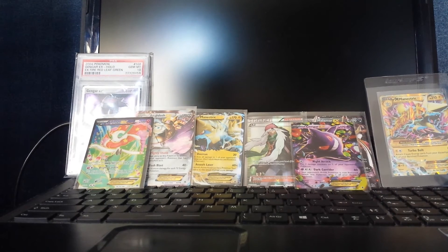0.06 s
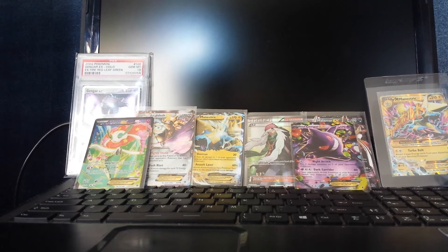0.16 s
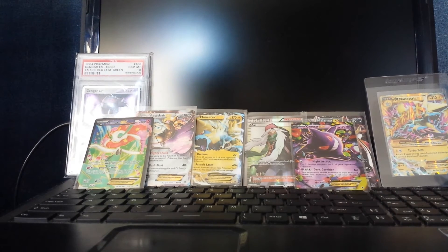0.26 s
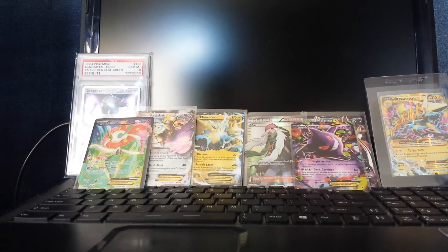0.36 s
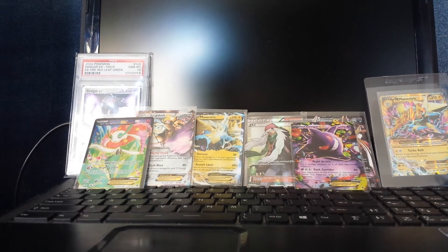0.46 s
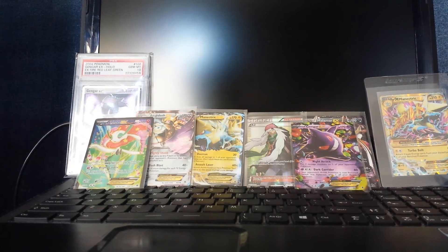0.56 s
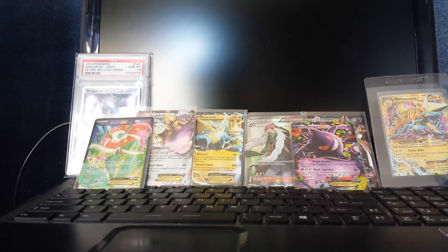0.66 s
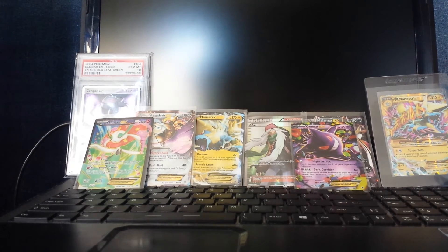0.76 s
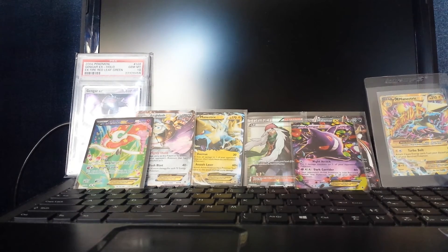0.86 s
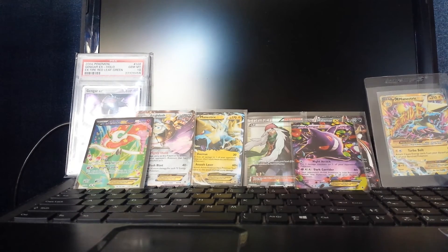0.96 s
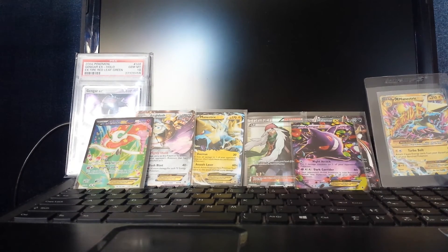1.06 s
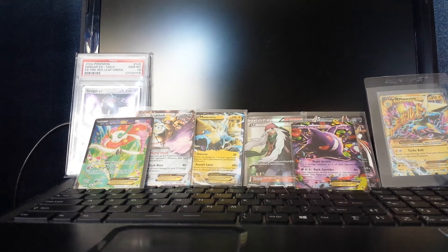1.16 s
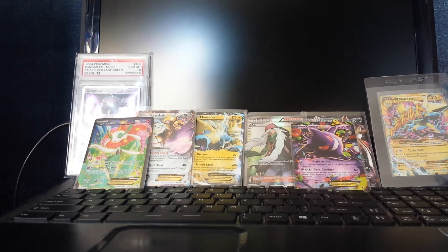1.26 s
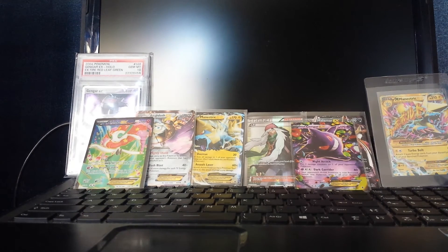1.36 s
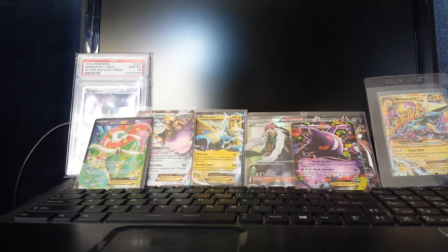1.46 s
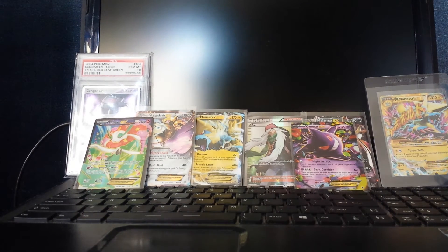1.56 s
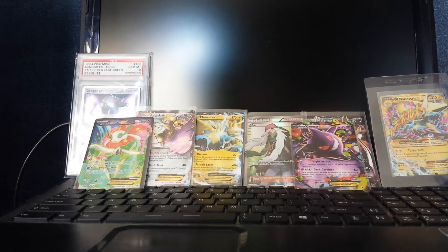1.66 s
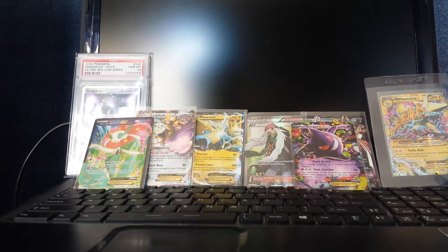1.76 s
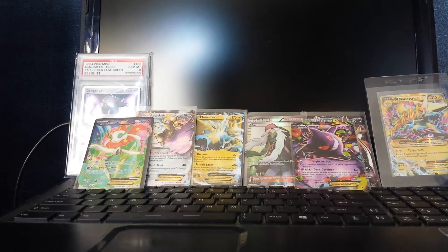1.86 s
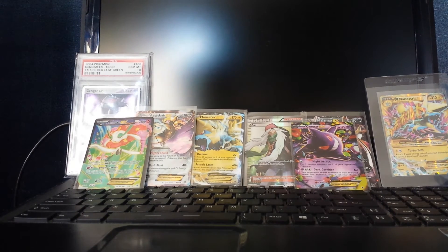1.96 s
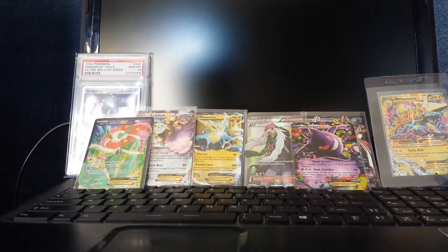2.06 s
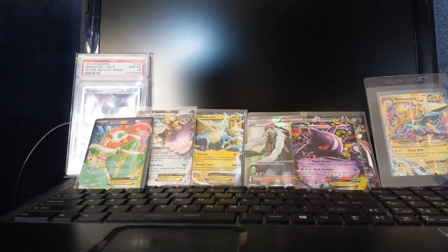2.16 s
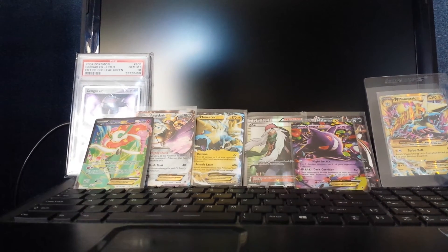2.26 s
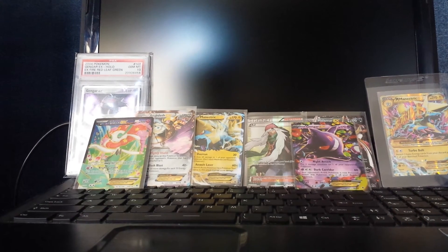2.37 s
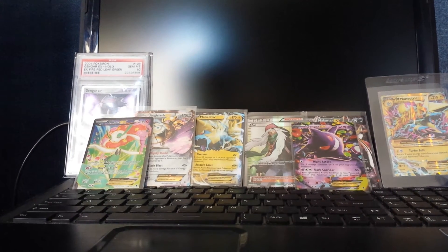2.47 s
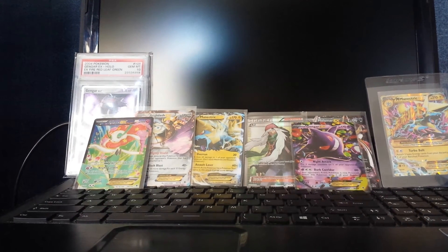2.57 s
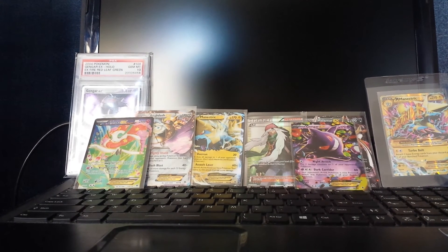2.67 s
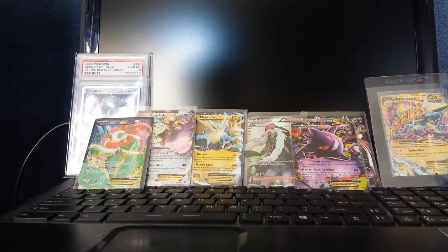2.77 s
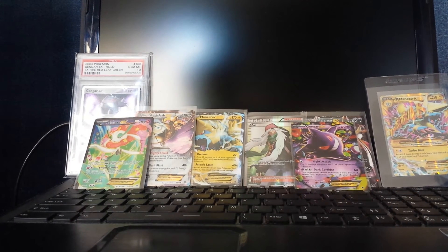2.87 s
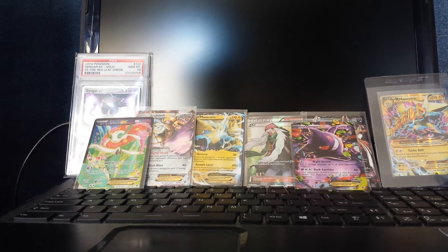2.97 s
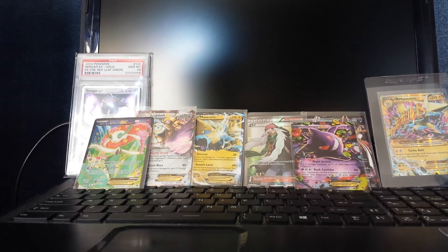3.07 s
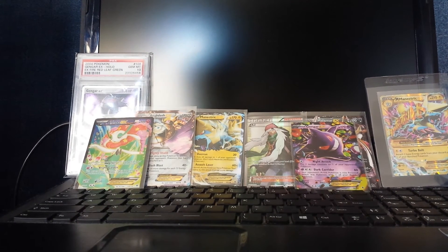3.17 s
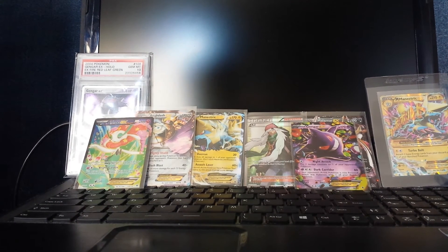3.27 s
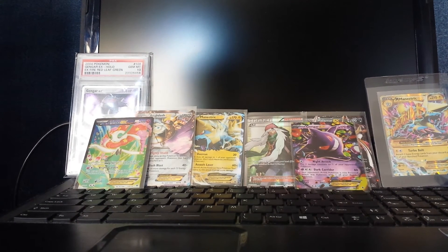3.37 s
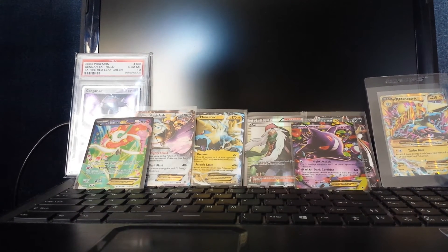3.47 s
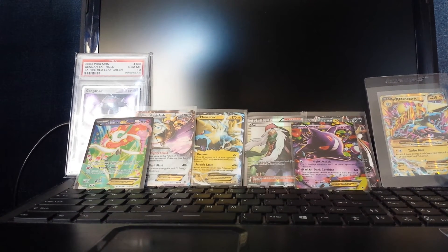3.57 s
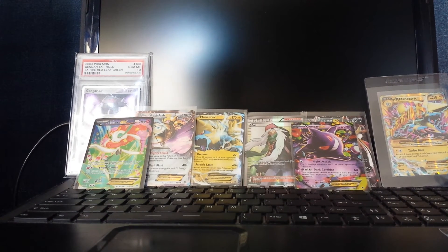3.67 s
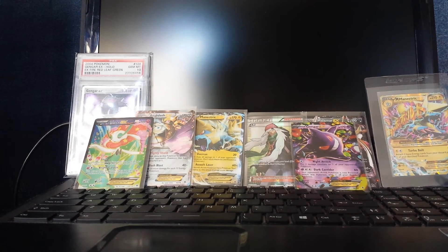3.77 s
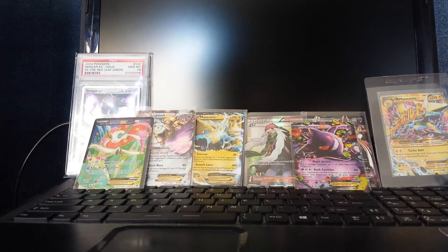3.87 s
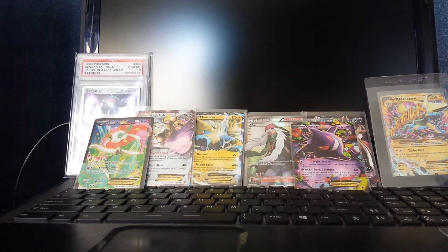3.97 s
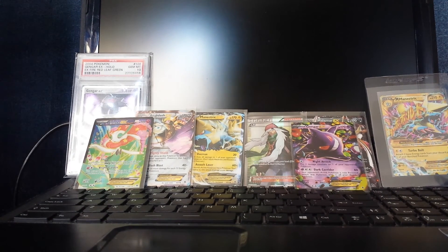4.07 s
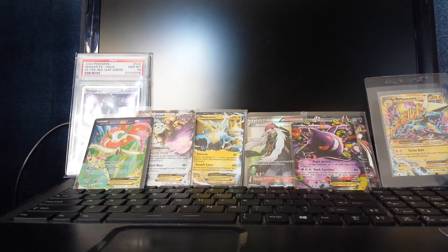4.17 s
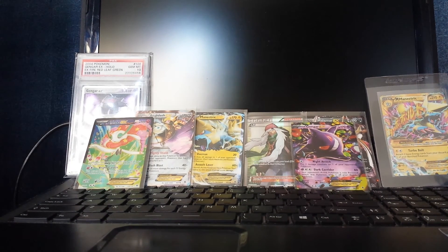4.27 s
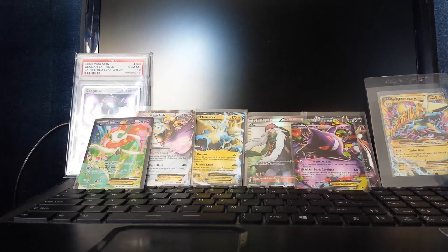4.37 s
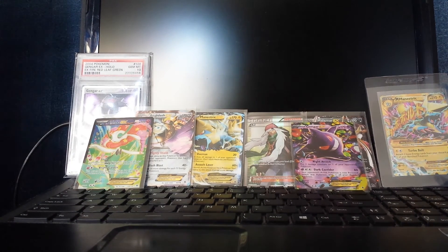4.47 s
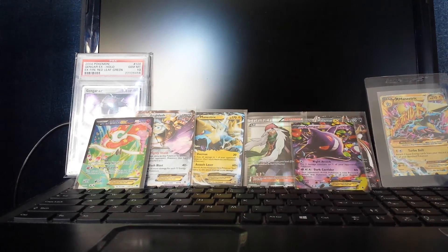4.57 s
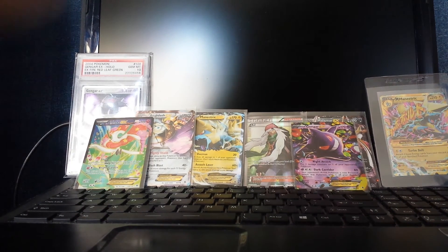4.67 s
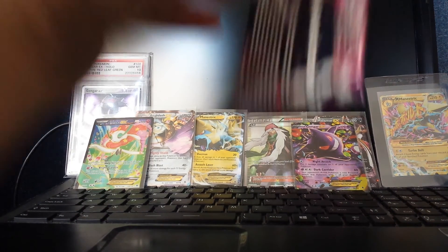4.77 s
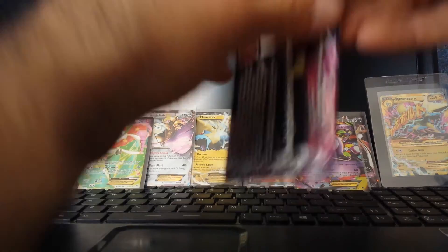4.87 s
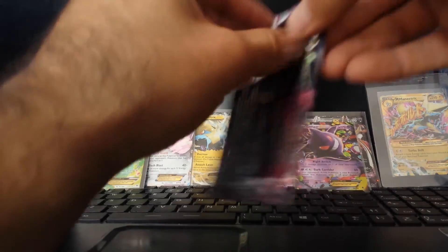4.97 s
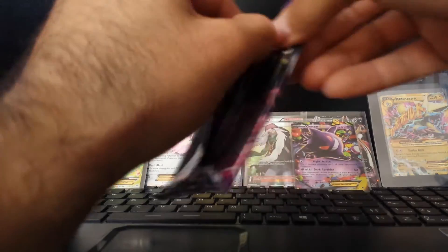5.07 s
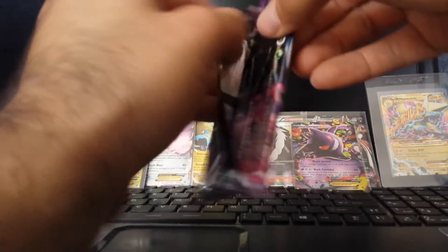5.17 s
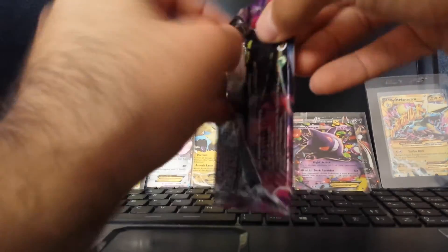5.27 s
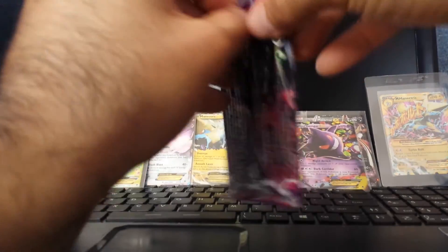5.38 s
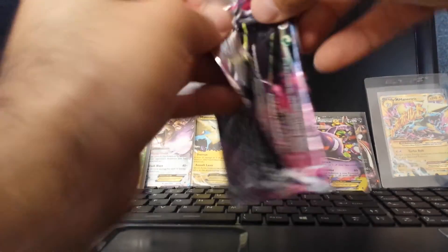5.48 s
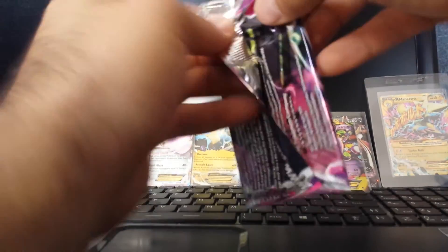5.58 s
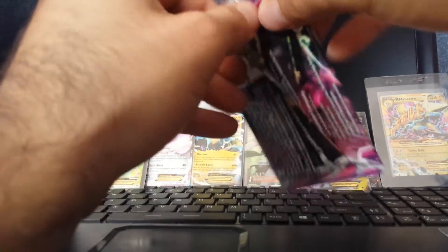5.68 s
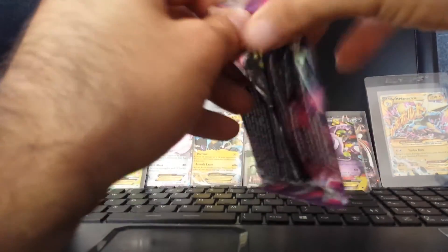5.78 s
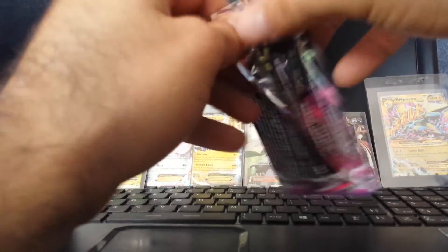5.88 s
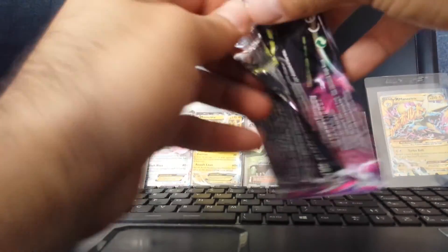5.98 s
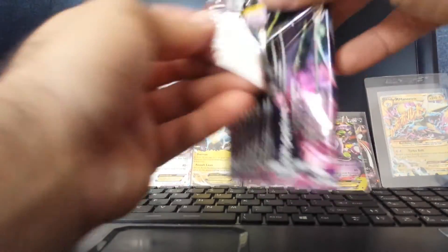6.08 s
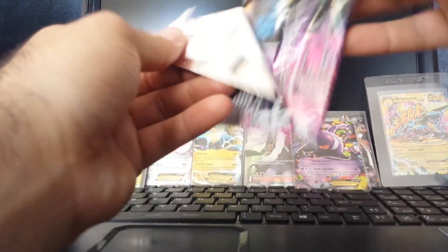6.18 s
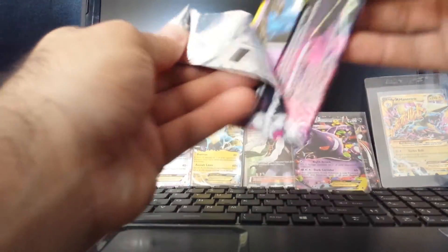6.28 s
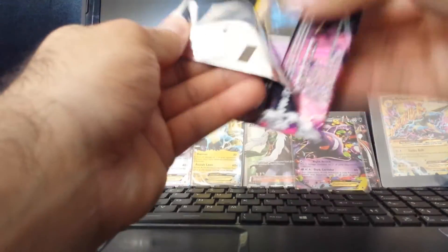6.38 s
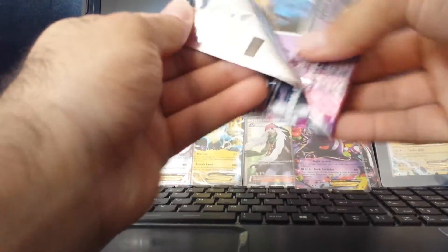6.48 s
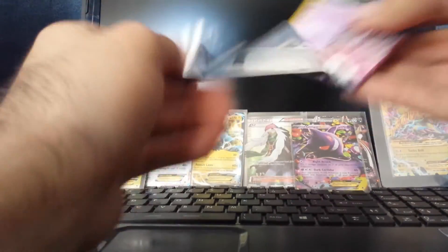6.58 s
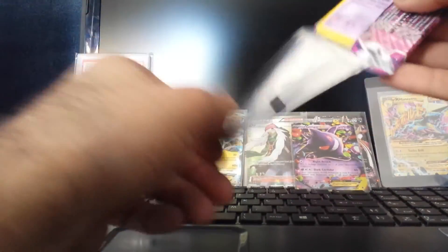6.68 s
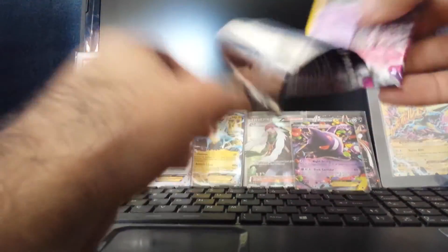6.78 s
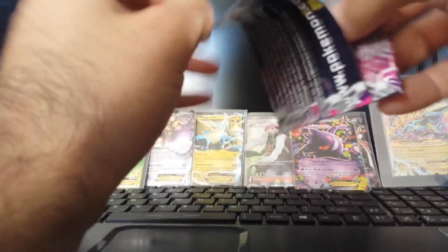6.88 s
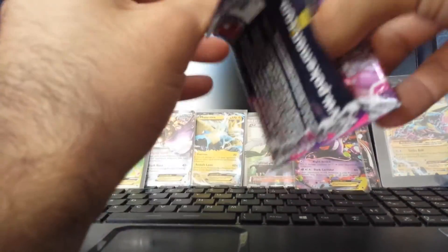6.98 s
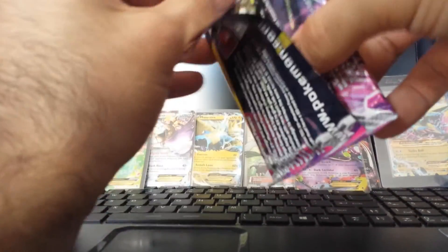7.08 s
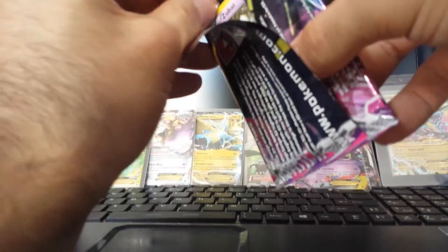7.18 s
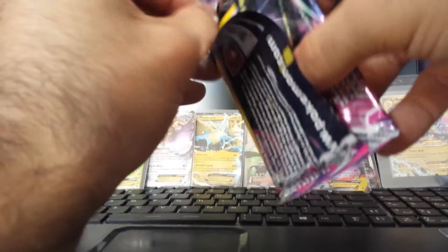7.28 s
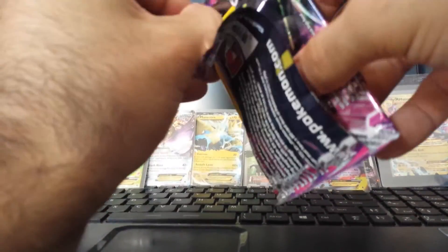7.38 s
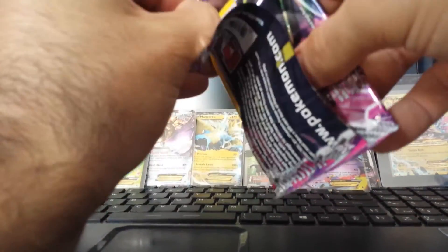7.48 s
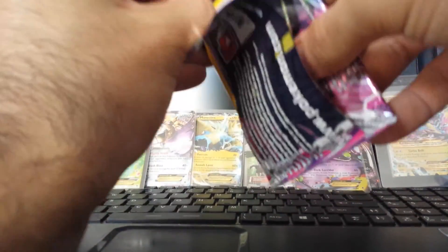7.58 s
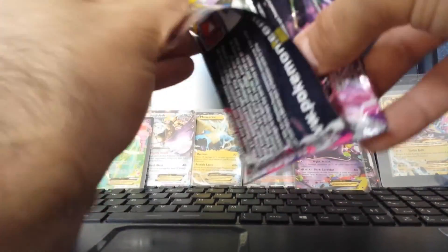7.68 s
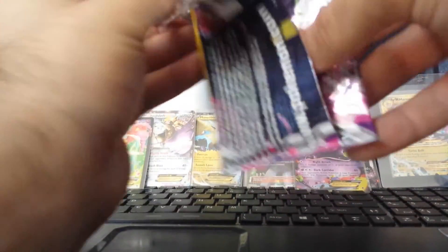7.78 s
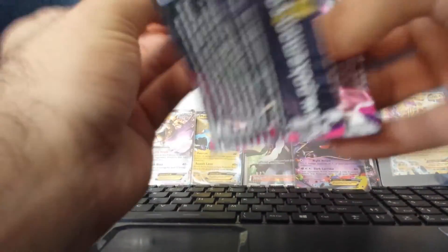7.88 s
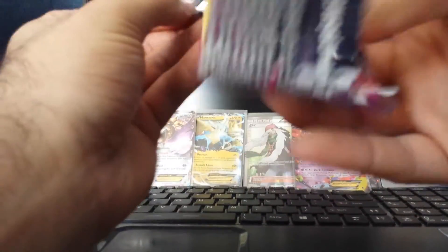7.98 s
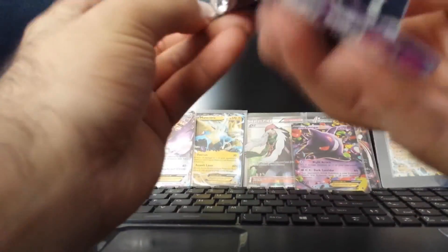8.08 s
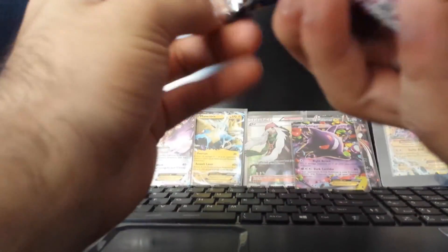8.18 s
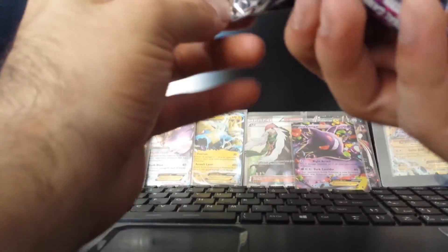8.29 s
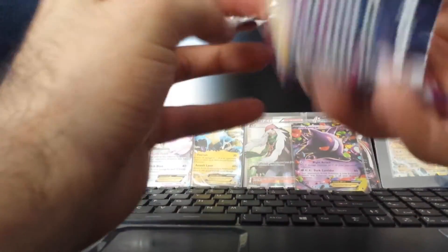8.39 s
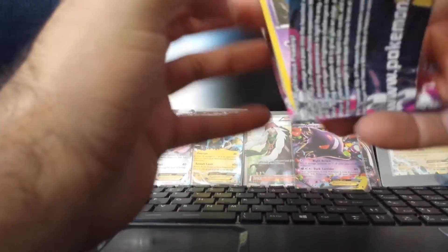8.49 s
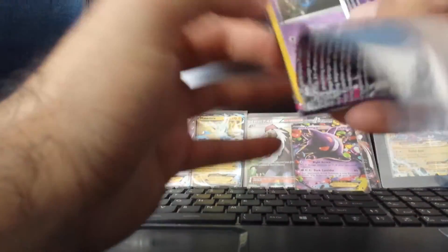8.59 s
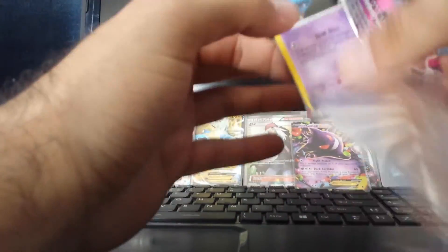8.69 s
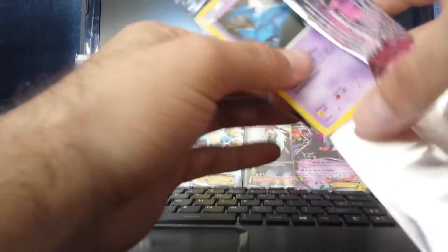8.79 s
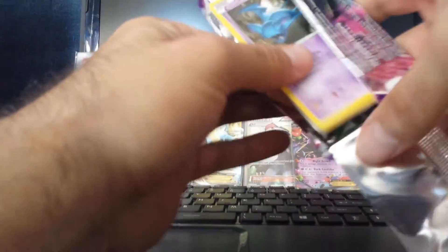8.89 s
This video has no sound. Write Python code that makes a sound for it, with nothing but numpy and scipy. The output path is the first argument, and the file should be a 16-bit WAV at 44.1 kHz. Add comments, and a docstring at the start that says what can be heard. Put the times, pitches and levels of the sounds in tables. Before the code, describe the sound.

After quiet clacks and swishes, stiff foil snaps and crinkles near the microphone, its seam tearing in two quick pulls.

```python
"""Creases of a foil trading-card pack snap one by one over a fine crinkle, close to a camera.
Each snap is a pair of buckling impulses, led by a tick, that excites facet, sheet and cards; dense grains crinkle.
Knocks and slides, filtered contact noise, come first and further off; the seam rips in two quick
pulls of close slips, then peels slowly and faintly. A small room answers; two microphone ports hiss faintly."""
import sys
import numpy as np
from scipy import signal
from scipy.fft import rfft, irfft, next_fast_len
from scipy.io import wavfile
from scipy.ndimage import uniform_filter1d, map_coordinates

SR = 44100
rng = np.random.default_rng(int(sys.argv[2]) if len(sys.argv) > 2 else 0)


def materialize(psi):
    """Save the field psi as 16-bit PCM at rate SR to the path in sys.argv[1].

    A 1-D psi becomes a single channel; in a 2-D psi each row is a channel.
    """
    bounded = np.clip(np.atleast_2d(psi).T, -1, 1)
    quanta = np.round(bounded * 32767).astype(np.int16)
    wavfile.write(sys.argv[1], SR, quanta)


N = 394254
TIME = np.arange(N) / SR


def amp(db):
    """Logarithmic level: decibels to amplitude gain."""
    return 10 ** (np.asarray(db) / 20)


def unit(x):
    """Normalization: scale to rms 1."""
    return x / np.sqrt(np.mean(x ** 2) + 1e-20)


def along(points, hz):
    """Logarithmic frequency: interpolate (Hz, value) points on a log axis."""
    f, v = np.transpose(points)
    return np.interp(np.log(hz + 1), np.log(f + 1), v)


def ports(balance_db):
    """Level difference: left and right gains of mean power 1, the left higher by the balance."""
    return unit(amp([[balance_db / 2], [-balance_db / 2]]))


def add(track, s, sound):
    """Superposition: mix a sound into a track at a time in seconds."""
    start = max(round(s * SR), 0)
    part = track[:, start:start + sound.shape[-1]]
    part += sound[..., :part.shape[-1]]


def coloured(x, spectrum, size=2048):
    """Minimum phase: a causal filter with the given spectrum, by folding its cepstrum."""
    gain = amp(along(spectrum, np.fft.rfftfreq(size, 1 / SR)))
    cepstrum = irfft(np.log(np.maximum(gain, 1e-6)))
    cepstrum[1:size // 2] *= 2
    cepstrum[size // 2 + 1:] = 0
    response = irfft(np.exp(rfft(cepstrum)))
    return signal.fftconvolve(x, response[None], axes=1)[:, :x.shape[1]]


def band(x, lo_hz, hi_hz, order=2):
    """Band limitation: a causal Butterworth band-pass."""
    edges_hz = [lo_hz, min(hi_hz, SR / 2 - 100)]
    return signal.lfilter(*signal.butter(order, edges_hz, 'band', fs=SR), x)


def wobble(rate):
    """Slow fluctuation: a smooth random curve, rate knots a second."""
    knots = rng.standard_normal(int(N * rate / SR) + 4)
    return map_coordinates(knots, [np.arange(N) * rate / SR])


def pair(apart):
    """Partial coherence: stereo noise whose two sides differ by a share."""
    mid, side = rng.standard_normal((2, N))
    return np.array([mid + apart * side, mid - apart * side])


def clicks(times, sizes, lag, spread_db):
    """Arrival difference: impulses reach the left port later by lag on average, each with its own lean."""
    chance = rng.standard_normal((len(times), 2))
    late = lag * (1 + chance[:, 0] / 2)
    lean = amp(spread_db * chance[:, 1])

    def place(s, gain):
        return np.bincount(np.clip(s * SR, 0, N).astype(int), gain, N + 1)[:N]
    return np.array([place(times + late, sizes * lean), place(times, sizes / lean)])


def strokes(rows, attack_s, release_s, arch_db):
    """Power addition: each hand stroke (s, length s, dB) sets in, arches or holds level and lets go."""
    power = np.zeros(N)
    for s, length, db in rows:
        span = slice(int(s * SR) + 1, int((s + length + 5 * release_s) * SR))
        t = TIME[span] - s
        arch = (2 * np.clip(t / length, 0, 1) - 1) ** 2
        ends = (1 - np.exp(-t / attack_s)) * np.exp(-np.maximum(t - length, 0) / release_s)
        power[span] += (amp(db - max(arch_db, 0) * arch) * ends) ** 2
    return np.sqrt(power)


# Spectrum of the low room noise. Each row: frequency in Hz, relative level in dB.
HUM_SPECTRUM = [(15, -25), (25, -12), (60, 0.5), (118, -4.5), (210, -4.5), (264, -5.5), (375, -5.5),
                (567, 1), (604, -8.5), (656, -8), (876, -11.5), (1350, -13), (3500, -20.5), (4550, -103),
                (7700, -120)]
# Hiss spectrum of the left port. Each row: frequency in Hz, relative level in dB.
LEFT_HISS_SPECTRUM = [(1500, -52), (3000, -17.5), (5500, -13), (7500, -20), (9500, -19), (15000, -23)]
# Hiss spectrum of the right port. Each row: frequency in Hz, relative level in dB.
RIGHT_HISS_SPECTRUM = [(1500, -52), (3000, -14.5), (5000, -11.5), (6400, -10.5), (7400, 2), (8200, -3.5),
                       (9500, -10.5), (12000, -18), (15000, -19)]


def background(hum_db=-65.5, left_db=-68, right_db=-59.0):
    """Stationary noise: a partly coherent low room noise and independent port hiss, the right resonant."""
    hum = amp(hum_db) * unit(coloured(pair(0.64), HUM_SPECTRUM, size=8192))
    left = amp(left_db) * unit(coloured(rng.standard_normal((1, N)), LEFT_HISS_SPECTRUM))
    right = amp(right_db) * unit(coloured(rng.standard_normal((1, N)), RIGHT_HISS_SPECTRUM))
    return hum + np.vstack([left, right])


# Things set down on the desk. Each row: start in seconds, relative peak level in dB,
# relative brightness in dB, relative ring of the desk in dB.
DESK_KNOCKS = [(.008, -30.5, -6.5, -1.5), (.085, -43.5, -3, -5), (.135, -45, -4.5, -5),
               (.307, -31.5, -3, -9), (0.416, -39.5, -11, -4), (.445, -45.5, -3.5, -4),
               (2.321, -56.5, 4.5, -6), (2.397, -58.5, -11, -2), (2.485, -52.5, -14, -1),
               (2.55, -45, -7, 2), (2.619, -26.5, -7, -6), (2.765, -54, -15, -17.5), (3.174, -70, 13.5, -8),
               (3.473, -44, -1.5, -17), (3.553, -45, -3, -14), (3.699, -41, 4, -22), (4.221, -53, 6, 0.5)]
# Spectrum of the hollow clack. Each row: frequency in Hz, relative level in dB.
CLACK_SPECTRUM = [(200, -17), (400, -13), (650, -11), (900, -5), (1200, 0), (1600, -4), (2300, -4),
                  (3200, -10), (4300, -16), (6500, -27), (12000, -50)]
# What the desk and the things on it ring with, before a random scatter of pitch and level.
# Each row: frequency in Hz, relative level in dB, decay time t60 in seconds.
RING_MODES = [(140, -29, .2), (205, -28, .22), (285, -26, .22), (640, -21, .12), (1040, -14, .1),
              (1150, -14, .11), (1260, -12, .13), (1480, -20, .25), (2340, -14, .13), (2820, -18, .12),
              (4450, -33, .45)]


def knocks(rattle_s=0.0053, thud_s=0.03, body_db=-4, thud_db=-43, thud_growth=0.39, tick_db=-2,
           land_s=.0095, edge_db=-2, edge_balance_db=-9, flat_balance_db=3):
    """Impact excitation: light things meet the desk edge, then land flat; clack, thud, tick and modal ring."""
    out, t = np.zeros((2, N)), np.arange(SR // 2) / SR

    def peak(x):
        return x / np.sqrt(np.max(uniform_filter1d(np.mean(x ** 2, axis=0), size=180)))
    hz, mode_db, t60 = np.transpose(RING_MODES)[:, :, None]
    edges = [(s, db + edge_db, bright, ring, edge_balance_db) for s, db, bright, ring in DESK_KNOCKS]
    flats = [(s + land_s, db, bright, ring, flat_balance_db) for s, db, bright, ring in DESK_KNOCKS]
    for s, db, bright, ring, balance_db in edges + flats:
        noise = rng.standard_normal((4, len(t)))
        strike = rng.standard_normal((2, len(hz), 1))
        contact = (noise[0] + noise[1:3]) * np.exp(-t / rattle_s)
        clack = amp(body_db) * peak(coloured(contact, CLACK_SPECTRUM))
        thud = peak(band(noise[3:] * np.exp(-t / thud_s), 115, 446))
        board = amp(thud_db + thud_growth * db) * thud  # even a soft landing thuds
        tick = amp(bright + tick_db) * peak(band(contact, 4100, 7760, order=3))
        decay = amp(mode_db + 2 * strike[0] - 60 * t / t60)
        modes = decay * np.sin(2 * np.pi * hz * (1 + .015 * strike[1]) * t)
        add(out, s, amp(db) * (ports(balance_db) * (clack + tick) + amp(ring) * modes.sum(0)) + board)
    return out


# Reverberation of the small room. Each row: frequency in Hz, decay time t60 in seconds.
ROOM_DECAY = [(120, 0.29), (500, 0.27), (1500, 0.28), (6000, 0.24), (14000, 0.28)]


def room(x, wall_db, tail_db, wall_s=0.01043, count=3):
    """Reverberation: a near wall answers, then a diffuse tail; a few random answers take turns."""
    out = np.zeros((2, N))
    for k in range(count):
        hz, t, z = signal.stft(rng.standard_normal((2, SR // 2)), SR, nperseg=256)
        decay = amp(-60 * t / along(ROOM_DECAY, hz)[:, None])
        tail = signal.istft(z * decay, SR, nperseg=256)[1]
        t = np.arange(tail.shape[1]) / SR
        tail *= np.clip((t - .003) / 0.013, 0, 1)
        wall = rng.standard_normal(tail.shape) * np.exp(-((t - wall_s) / 0.0023) ** 2)
        answer = (amp(tail_db) * unit(tail) + amp(wall_db) * unit(wall)) / np.sqrt(len(t))
        here = (TIME // .11) % count == k  # 0.11 s a turn
        out += signal.fftconvolve(x * here, answer, axes=1)[:, :N]
    return out


# Packs slide over each other, further off. Each row: start in seconds, length in seconds,
# relative level in dB.
PACK_SLIDES = [(.895, 0.05, -49), (1.03, 0.061, -56.5), (1.205, 0.042, -42), (1.37, 0.14, -63),
               (1.86, .05, -54.5), (2.1, 0.02, -54), (2.33, 0.59, -63.5), (3.3, 0.23, -56),
               (3.535, 0.039, -45.5), (3.6, 0.067, -52.5), (3.692, 0.032, -37)]
# Spectrum of the swish. Each row: frequency in Hz, relative level in dB.
SWISH_SPECTRUM = [(500, -26), (1200, -19), (2500, -16), (3800, -11), (5200, 0), (7200, 1), (9500, -8),
                  (14500, -15)]


def slides(grain_db=6.5, gain_db=0):
    """Sliding friction: smooth wrappers swish over each other, as noise of fluctuating level."""
    rub = rng.standard_normal((2, N)) * amp(grain_db * wobble(250))
    swish = unit(coloured(rub, SWISH_SPECTRUM))
    stroke = strokes(PACK_SLIDES, attack_s=0.015, release_s=0.0069, arch_db=-3.5)
    return amp(gain_db) * stroke * ports(-3.5) * swish


# The loudest creases that buckle; the first row is the tick of a sliding pack. Each row: start in seconds,
# relative level in dB, facet pitch in Hz, relative flex of the sheet in dB, left over right in dB.
LOUD_SNAPS = [(3.703, -23.5, 7660, -26, -13), (4.227, -35.5, 6600, -23, -4), (4.238, -31, 6840, -19, -5.5),
              (4.3397, -31, 5100, -1.5, 11), (4.358, -22.5, 7600, -11, -27), (4.375, -24, 6000, -34, -3),
              (4.59, -17, 7160, -21, 0), (4.6001, -24.5, 7340, -19, -18), (4.7642, -33, 5160, -6.5, 8),
              (4.8116, -17, 5600, -34, -11), (4.932, -31, 5300, -3, 2), (4.9695, -14.5, 5800, -16.5, 2),
              (5.0483, -13.5, 7100, -12.5, -10), (5.24, -12, 6900, -25, -5.5), (5.274, -16, 6600, -36, -20),
              (5.2924, -16.5, 5340, -29, -6), (5.3104, -22.5, 7140, -27, -4), (5.3683, -15.5, 6550, -7, -2),
              (5.398, -27, 6640, -29, 3), (5.4105, -24, 6300, -30, -3), (5.4385, -20.5, 5500, -15, -6),
              (5.4843, -17.5, 6300, -32, -9), (5.5012, -16.5, 7200, -35, -6),
              (5.5318, -14.5, 7150, -20, -7.5), (5.536, -23, 6640, -9, 1),
              (5.584, -15.5, 6700, -19.5, -4.5), (5.665, -27.5, 5070, -9, -7), (5.6999, -27, 5750, -14, -2),
              (5.7083, -22.5, 6850, -15, 1), (5.7808, -16.5, 4630, -17, 3), (5.793, -21.5, 6300, -18, -9),
              (5.831, -21, 6300, -13.5, -5), (5.848, -27, 6800, -37, -7), (5.8604, -19.5, 5700, -25, -5),
              (5.8678, -20.5, 6100, -28, -1), (5.9721, -24.5, 6240, -18, 4), (5.9854, -25, 4400, -12, -10),
              (5.997, -20.5, 5800, -17, 2), (6.0497, -16.5, 6560, -20, -4), (6.0611, -18.5, 6110, -30, -6),
              (6.1142, -24, 6850, -30, -12), (6.2723, -29, 6810, -10, -9), (6.322, -33.5, 5970, -6.5, 14),
              (6.4071, -17, 6200, -10.5, 0), (6.6096, -17, 6760, -22, 1), (6.6198, -20, 6960, -20, -18),
              (6.6878, -14.5, 7660, -22, -6), (6.6965, -19, 7300, -39, -3), (6.756, -23, 6840, -19.5, -7),
              (6.8129, -21.5, 6200, -27, -4), (6.9025, -19, 6430, -35, -1.5), (6.9754, -34, 5400, -11, -2),
              (7.2235, -23, 5030, -12.5, -6), (7.3655, -17.5, 5330, -8, -3), (7.3785, -21, 7200, -35, -12),
              (7.4027, -20.5, 6400, -27, -1.5), (7.4372, -29.5, 5660, -1, -4),
              (7.458, -23, 6500, -13.5, -6), (7.479, -27.5, 7200, -30, -2), (7.5878, -28, 6800, -12, -2),
              (7.66, -16.5, 6160, -26, -2), (7.695, -13, 5400, -8.5, -3.5), (7.7033, -22.5, 6440, -7.5, -2),
              (7.7155, -17, 6160, -12, -2), (7.7526, -15, 6800, -17.5, -4.5), (7.8224, -22.5, 5600, -15, 0),
              (7.899, -19, 6800, -53, -26), (7.9125, -24, 6300, -11, 4), (7.9838, -28, 6150, -21, 5),
              (8.0375, -24.5, 6900, -15.5, -8), (8.0855, -24, 5430, -15.5, -1),
              (8.106, -21.5, 6200, -10, -6), (8.1432, -33.5, 5700, -7.5, 9), (8.1747, -24, 5100, -17, -6),
              (8.229, -36.5, 7580, -20, 0), (8.4099, -33.5, 5560, -12, -2), (8.4363, -27, 6500, -21, -4),
              (8.4936, -28.5, 6060, -11, 4), (8.5354, -21, 5740, -23.5, -38),
              (8.662, -16.5, 6800, -19, 1.5), (8.7375, -16, 6640, -33, -33), (8.8548, -29, 6000, -32, 3),
              (8.9314, -18.5, 7700, -17.5, 1.5)]


def snaps(rows, flip_s=0.00068, flutter=0.34, second=0.97, second_s=0.0016,
          ring_db=-24, ring_s=0.0049, lead_db=-31, lead_s=0.0017, tick_db=-15, tick_s=0.0053,
          width=1.224, body_db=0, flex_db=-3.0, edge_db=-15, stack_db=-15, count=4):
    """Snap-through buckling: a crease ticks and flips twice; facet, sheet, edge and cards respond."""
    out, t = np.zeros((2, N)), np.arange(-SR // 100, SR // 40) / SR
    after = t >= 0

    def attack(x):  # equal energy, that of rms 1 held for 3 ms
        return x / np.sqrt(np.sum(x ** 2) / 2 / (SR * .003))
    for s, db, hz, flex, balance_db in rows:
        noise = rng.standard_normal((5, len(t)))
        ragged = flutter * (noise[0] + noise[1:3] / 2)
        flip = (t == 0) + ragged * after * np.exp(-np.abs(t) / flip_s)
        again = np.roll(flip, int(rng.uniform(.2, 1) * second_s * SR), axis=1)
        flip = flip + second * rng.uniform(-1.32, 1) * again
        tick_gain = amp(tick_db) * rng.uniform(-1.3, 1)
        tick = np.roll(flip, -int(rng.uniform(0.19, 1) * tick_s * SR), axis=1)  # ahead of the flip
        flip = flip + tick_gain * tick
        rise = amp(lead_db) * np.exp(-np.abs(t) / lead_s)
        shiver = np.where(after, amp(ring_db) * np.exp(-np.abs(t) / ring_s), rise)
        push = flip + shiver * noise[3:]
        push[0] = np.roll(push[0], count)  # the left port is further away, by count samples
        facet = attack(band(band(push, hz / width, hz * width, order=1), 2790, 8500, order=3))
        sheet = attack(band(push, 914, 2080))
        stack = attack(band(push, 217, 566, order=2))
        sizzle = attack(band(push, 6650, 13300))
        bright = amp(body_db) * facet + amp(edge_db) * sizzle
        dull = amp(flex) * (amp(flex_db) * sheet + amp(stack_db) * stack)
        add(out, s + t[0], amp(db) * (ports(balance_db) * bright + dull))
    return out


# The fingers squeeze the wrapper. Each row: start in seconds, length in seconds, relative level in dB.
FINGER_SQUEEZES = [(4.36, 0.13, -42), (4.565, 0.018, -29), (4.715, 0.054, -46), (4.82, 0.28, -42),
                   (4.972, 0.049, -36.5), (5.05, 0.45, -36.5), (5.365, .23, -31.5), (5.48, .028, -23.5),
                   (5.783, 0.099, -28), (6.065, 0.16, -23.5), (6.3, 0.078, -40), (6.408, 0.018, -37.5),
                   (6.515, 0.043, -43), (6.565, 0.14, -28), (6.735, 0.11, -39), (6.905, 0.054, -70),
                   (7.09, 0.22, -47.5), (7.365, 0.075, -35.5), (7.695, 0.04, -29), (7.8, 0.071, -43),
                   (7.9, 0.31, -43.5), (8.22, 0.14, -52.5), (8.405, 0.093, -44), (8.52, 0.36, -47.5),
                   (8.66, 0.81, -41)]


def strain(settle_s=0.0067, settle_db=-21):
    """Mechanical working: squeezes strain the foil, and after each loud snap the sheet settles."""
    settling = [(s, settle_s, db + settle_db) for s, db, *_ in LOUD_SNAPS]
    return np.hypot(strokes(FINGER_SQUEEZES, attack_s=0.0047, release_s=0.029, arch_db=2.5),
                    strokes(settling, attack_s=0.00086, release_s=0.035, arch_db=3.5))


# Spectrum of the crinkling foil. Each row: frequency in Hz, relative level in dB.
FOIL_SPECTRUM = [(100, -52), (400, -31), (800, -19), (1200, -11), (2000, -8), (2400, -10), (2900, -5),
                 (3900, -6), (5200, 0), (7400, 0), (9500, -11), (14500, -16)]


def crinkle(worked, rate=700, rub=0.81, clump_db=3.0, gain_db=-3):
    """Crackling noise: countless tiny creases, rate a second, give way in clumps while foil rubs on foil."""
    count = int(rate * N / SR)
    times = rng.uniform(0, N / SR, count)
    size_db = 5 * np.minimum(rng.exponential(size=count), 3.5)
    sizes = amp(size_db) * rng.choice([-1, 1], count)
    facet_hz = np.geomspace(1500, 12000, 6)
    grains = 0
    for k, hz in enumerate(facet_hz):  # each crease has the colour of its own facet
        group = slice(k, None, len(facet_hz))
        own = clicks(times[group], sizes[group], lag=.0001, spread_db=1.0)
        grains = grains + own / 2 + 2 * band(own, hz / 1.18, hz * 2.05, order=1)
    rustle = unit(grains) + rub * rng.standard_normal((2, N))
    clumped = unit(amp(clump_db * wobble(89)) * coloured(rustle, FOIL_SPECTRUM))
    return amp(gain_db) * worked * ports(-1.7) * clumped


# Fingers press on the stack of cards. Each row: start in seconds, length in seconds, relative level in dB.
CARD_PRESSES = [(4.22, 0.0086, -52), (4.585, .025, -49), (4.71, 0.36, -61.5), (5.0, 0.071, -48.5),
                (5.225, .02, -54.5), (5.365, 0.1, -52.5), (6.165, .06, -48.5), (6.53, 0.092, -45),
                (6.71, 0.1, -56.5), (7.195, 0.03, -52.5), (8.085, 0.021, -48), (8.415, 0.031, -51)]
# Spectrum of the card stack. Each row: frequency in Hz, relative level in dB.
CARD_SPECTRUM = [(60, -12), (130, 0.5), (260, 1.5), (600, 8), (1300, -4.5), (2500, -1), (5000, -37)]


def handling(gain_db=-1, bump_db=3):
    """Contact noise: fingers bump and rub the stack of cards through the foil."""
    press = strokes(CARD_PRESSES, attack_s=0.0035, release_s=.015, arch_db=0)
    bumps = unit(coloured(pair(0.29) * amp(bump_db * wobble(45)), CARD_SPECTRUM))
    return amp(gain_db) * press * bumps


def small_snaps(worked, over_db=4, scatter_db=3, most_db=-28, facet_hz=6200, flex_db=-14,
                balance_db=-2, count=190):
    """Random buckling: lesser creases, louder the harder the foil is worked; rows as in LOUD_SNAPS."""
    times = rng.uniform(FINGER_SQUEEZES[0][0], TIME[-1], count)
    chance = rng.standard_normal((count, 4))
    worked_db = 20 * np.log10(np.interp(times, TIME, worked) + 1e-6)
    db = worked_db + over_db + scatter_db * chance[:, 0]
    return np.column_stack([times, np.minimum(db, most_db), facet_hz * np.exp(0.084 * chance[:, 1]),
                            flex_db + 4 * chance[:, 2], balance_db + 7 * chance[:, 3]])


# Pulls along the seam, the last a slow peel. Each row: start in seconds, length in seconds,
# relative level in dB.
SEAM_PULLS = [(5.03, 0.032, -20), (5.06, 0.16, -18), (5.22, .1, -28.5), (6.06, 0.15, -25),
              (8.225, 0.15, -56)]
# How the tear advances. Each row: time in seconds, mean slips per second, unevenness from 0 to 1.
TEAR_PACE = [(5.03, 430, 0.2), (5.081, 1040, 0.52), (5.119, 1050, 0.64), (5.136, 570, 0.03),
             (5.171, 516, 0), (5.176, 1300, 0.4), (5.33, 500, .9), (6.05, 420, 0.65), (6.249, 420, 0.55),
             (8.219, 122, 0.2)]
# Spectrum of the tearing seam. Each row: frequency in Hz, relative level in dB.
SEAM_SPECTRUM = [(700, -48), (1200, -24), (2300, -17), (3100, -5), (3900, -5), (4800, -1), (5700, 0),
                 (8000, -4), (9200, -14), (14500, -21)]


def rips(fray=1.0, flutter_s=0.0025, gain_db=0.5):
    """Stick-slip: the seam gives in a fast run of slips, briefly regular enough to zip."""
    s, pace, uneven = np.transpose(TEAR_PACE)
    turns = np.cumsum(np.interp(TIME, s, pace)) / SR
    times = np.interp(np.arange(1, int(turns[-1])), turns, TIME)  # one slip a turn
    chance = rng.standard_normal((len(times), 2))
    rough = np.interp(times, s, uneven)
    times = times + rough * chance[:, 0] / np.interp(times, s, pace) / 2
    sizes = amp((1.5 + 3.5 * rough) * chance[:, 1])
    slips = clicks(times, sizes, lag=.0001, spread_db=1)
    # a ragged slip leaves the film fluttering for a moment
    decay = signal.lfilter([1], [1, -np.exp(-1 / (SR * flutter_s))], slips)
    flutter = decay * rng.standard_normal((2, N))
    frayed = fray * np.interp(TIME, s, uneven) * unit(flutter)
    sound = coloured(unit(slips) + frayed, SEAM_SPECTRUM)
    power = uniform_filter1d(np.mean(sound ** 2, axis=0), size=1400)
    sound /= np.sqrt(np.abs(power) + 1e-6)  # evens out the level before the pulls shape it
    pull = strokes(SEAM_PULLS, attack_s=0.013, release_s=0.0054, arch_db=4)
    return amp(gain_db) * pull * ports(0.5) * sound


# The right port has a resonance and is the brighter one. Each row: frequency in Hz, left over right in dB.
PORT_BALANCE = [(1000, 0.5), (2500, 0.5), (3800, 3), (5600, 4), (6600, 0.5), (7600, -7), (9500, -3.5),
                (15000, -2.5)]


def through_ports(x):
    """Transfer function: each port colours the sound in its own way, by half the balance."""
    left = coloured(x[:1], [(hz, db / 2) for hz, db in PORT_BALANCE])
    right = coloured(x[1:], [(hz, -db / 2) for hz, db in PORT_BALANCE])
    return np.vstack([left, right])


def scene():
    """Direct-to-reverberant ratio: the wrapper, carried from the back of the desk to the camera, grows drier."""
    worked = strain()
    all_snaps = LOUD_SNAPS + list(small_snaps(worked))
    foil = snaps(all_snaps) + crinkle(worked) + rips() + handling()
    distance = amp(np.interp(TIME, [4.6, 4.8], [7, 0]))  # extra room sound, in dB
    far = knocks() + slides()
    near_room = room(foil * distance, wall_db=-18.0, tail_db=-15.5)
    far_room = room(far, wall_db=-2.5, tail_db=-1.0)
    return through_ports(foil + near_room + far + far_room) + background()


TOP_HZ = 14750  # band limit of the camera


def record(dry):
    """Saturation and band limit: the camera clips at full scale, then cuts steeply above TOP_HZ."""
    size = next_fast_len(N + SR // 2)
    hz = np.fft.rfftfreq(size, 1 / SR)
    spectrum = rfft(np.clip(dry, -1, 1), size)
    return irfft(spectrum / np.sqrt(1 + (hz / TOP_HZ) ** 120), size)[:, :N]


dry = scene()
out = record(dry)
materialize(out)
```